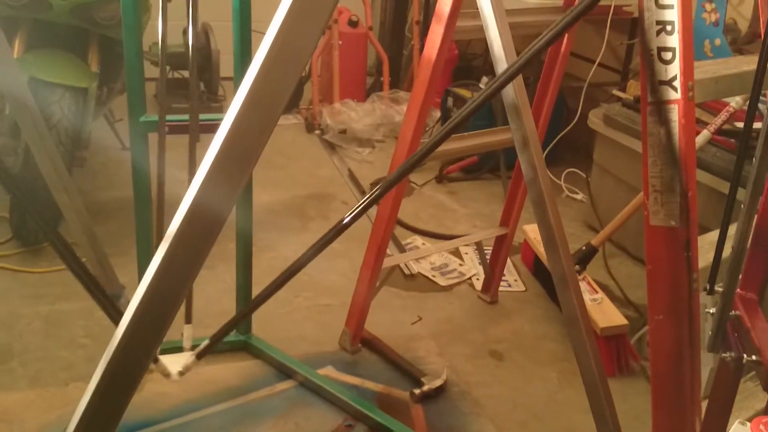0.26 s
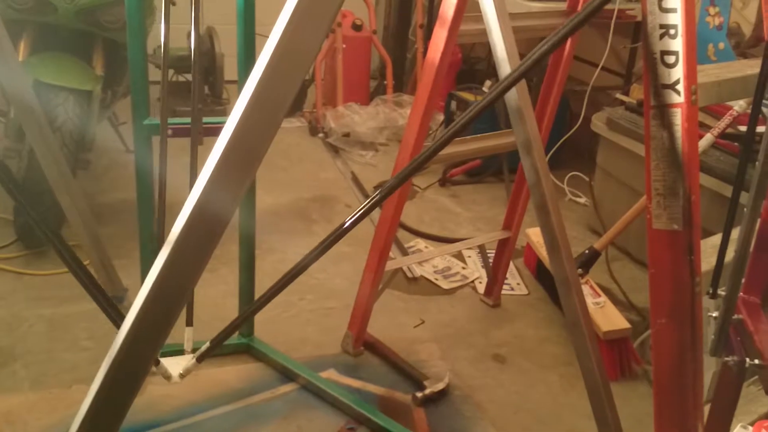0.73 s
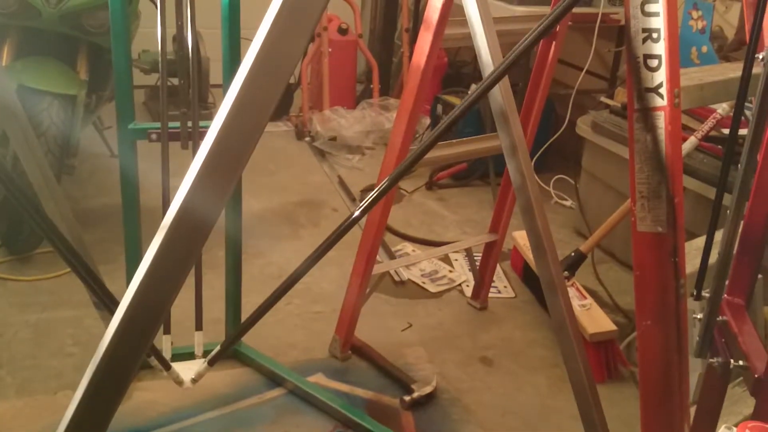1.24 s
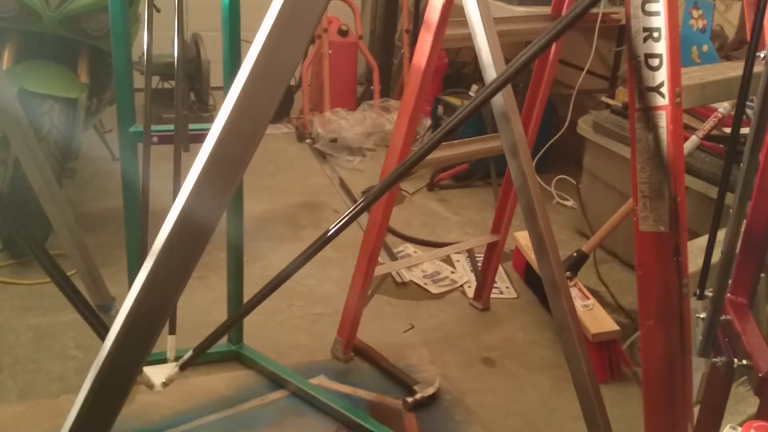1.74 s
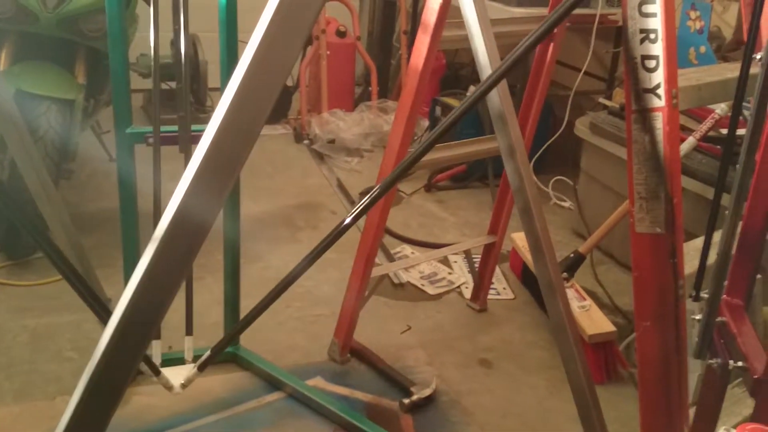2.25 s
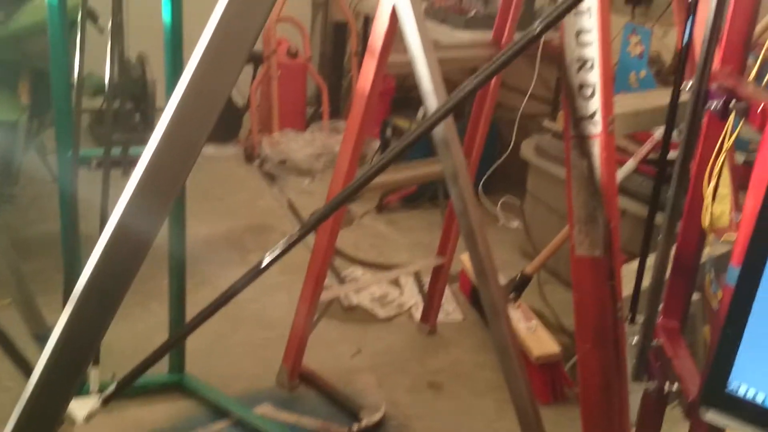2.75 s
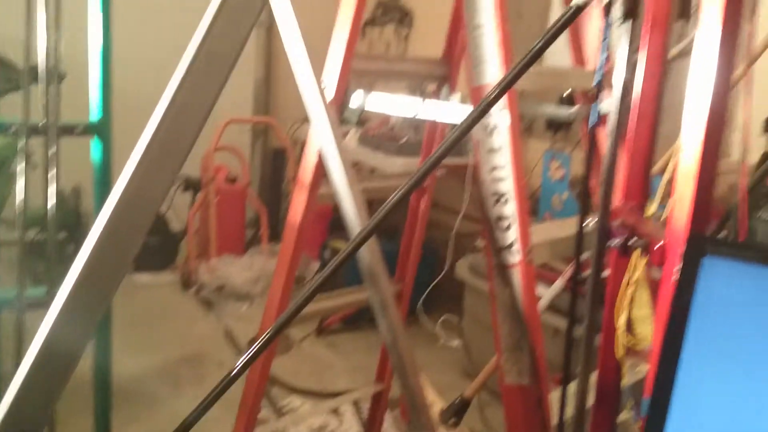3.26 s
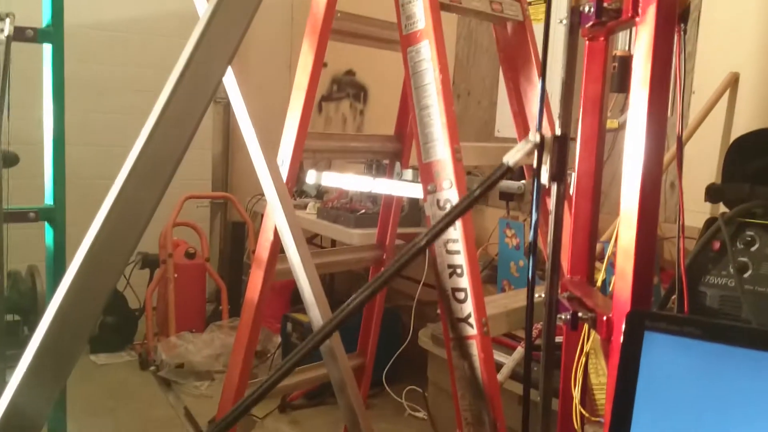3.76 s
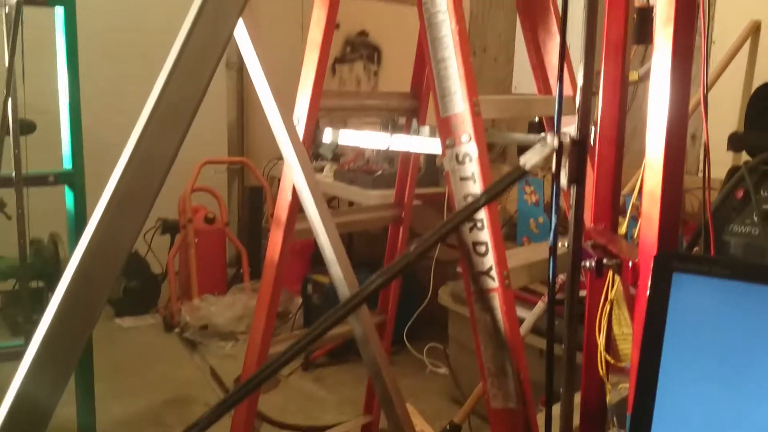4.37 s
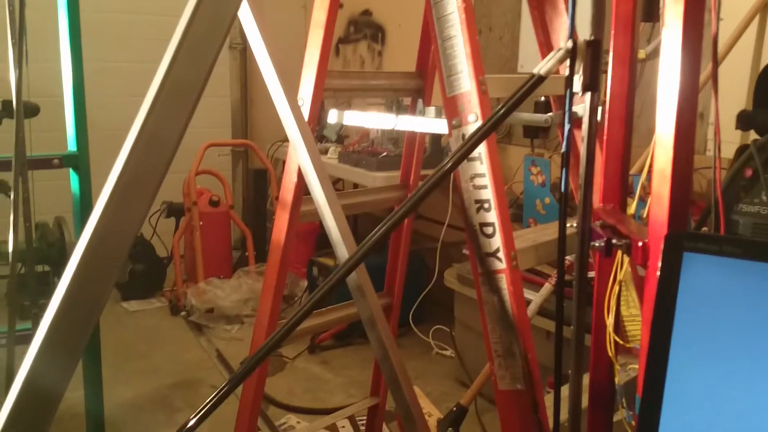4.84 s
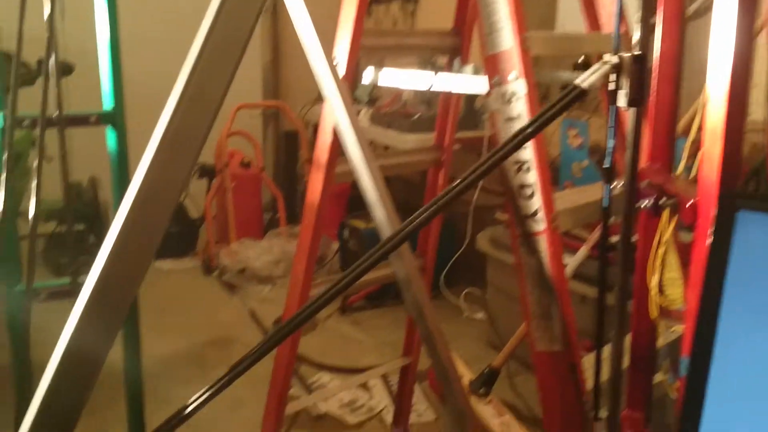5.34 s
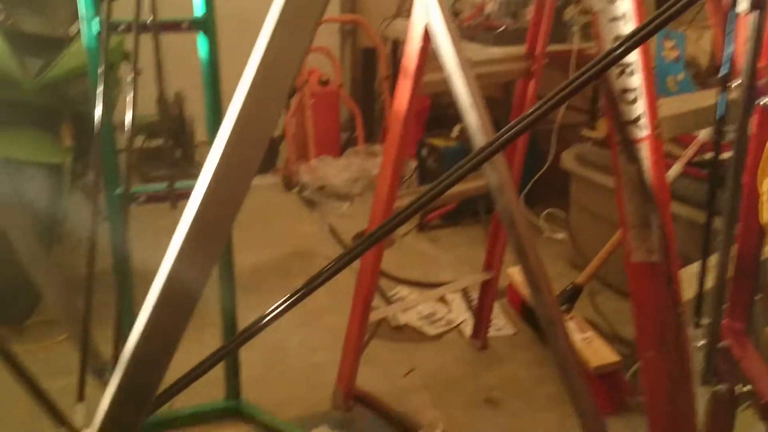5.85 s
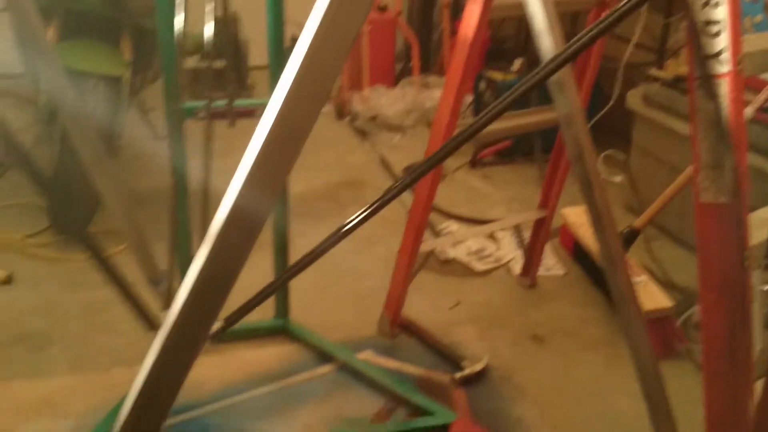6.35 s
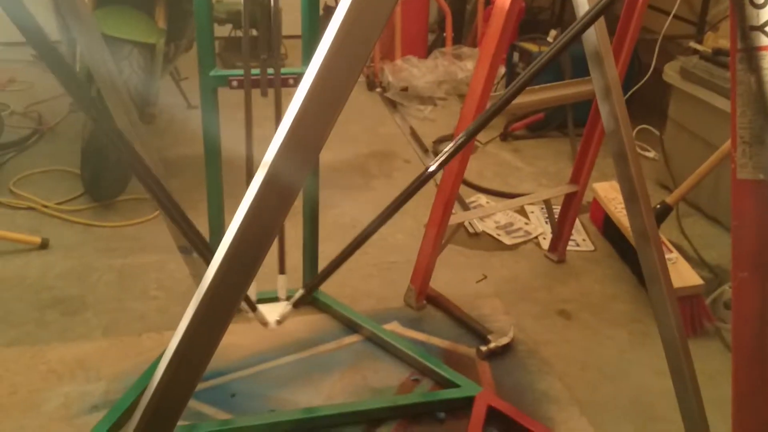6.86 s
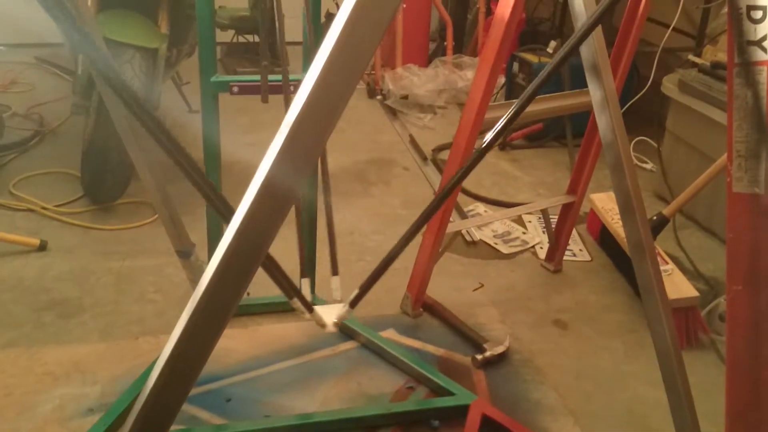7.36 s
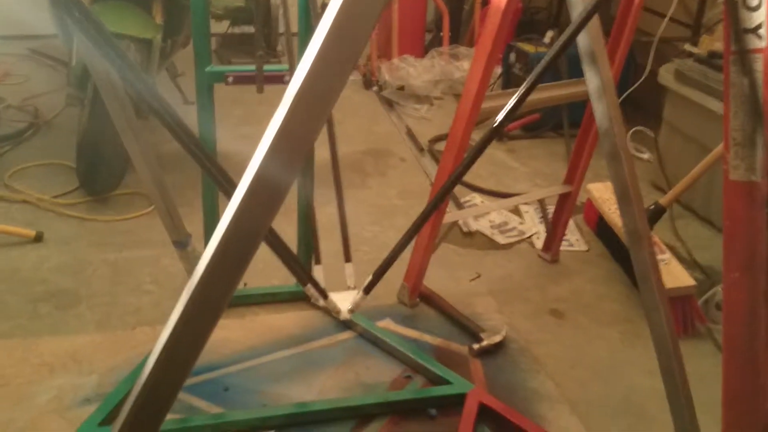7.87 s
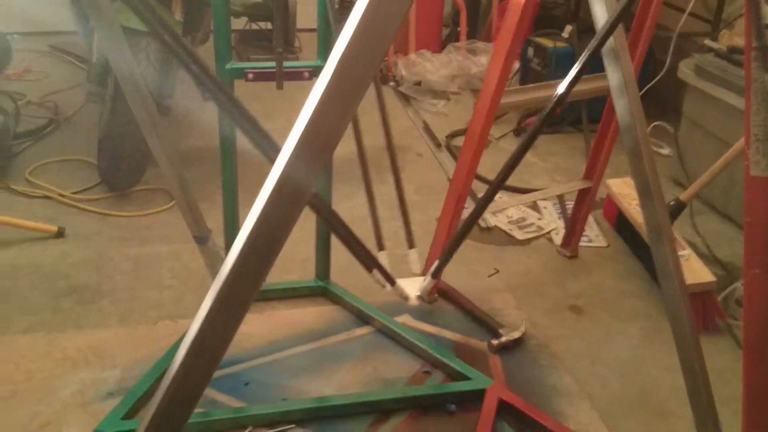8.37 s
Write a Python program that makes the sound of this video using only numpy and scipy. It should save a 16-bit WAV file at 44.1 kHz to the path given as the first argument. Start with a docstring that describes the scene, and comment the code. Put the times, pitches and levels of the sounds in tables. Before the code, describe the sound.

A large 3D printer's stepper motors whine in short runs, sweeping up and down in pitch over hissing carriages in a quiet garage.

```python
"""A large delta 3D printer makes short runs in a quiet garage, heard from a hand-held phone.
It opens at top speed: the steppers' tone beats with the controller's tick over hissing carriages.
The motors sweep down, then up and down in eight more quick runs, ringing the steel frame.
Sharp clicks fall in a pause near 6 s, and the longest, buzziest run follows.
Two short runs close the scene; between them, at 8.5 s, the hand gives the phone its hardest bump."""
import sys
import numpy as np
from scipy import signal
from scipy.fft import irfft, next_fast_len
from scipy.io import wavfile
from scipy.ndimage import uniform_filter1d

SR = 44100
rng = np.random.default_rng(int(sys.argv[2]) if len(sys.argv) > 2 else 0)


def master(y):
    """Save y as 16-bit WAV."""
    cut = np.clip(np.atleast_2d(y).T, -1, 1)
    pcm = np.round(cut * 32767)  # scale
    wavfile.write(sys.argv[1], SR, pcm.astype(np.int16))


N = 379701
T = np.arange(N) / SR
STEP_HZ, TICK_HZ = 1093.8, 2009.5  # step rate at top speed, controller's tick rate
SPEED_UP_HZ_PER_S, BRAKE_HZ_PER_S = 11500, 6300
TOP_HZ = 15800  # the phone's treble limit


def undb(db):
    """Decibels to gain."""
    return np.exp(np.asarray(db) * (np.log(10) / 20))


def unit(x):
    """Scale to an rms of 1."""
    return x / np.sqrt(np.mean(x ** 2))


def curves(table):
    """Automation curves, one for each column after the time."""
    times, *columns = np.transpose(table)
    return [np.interp(T, times, column) for column in columns]


def colour(points, hz):
    """Gain of an EQ curve at the given frequencies."""
    point_hz, db = np.transpose(points)
    return undb(np.interp(np.log(hz + 1), np.log(point_hz), db))


def walk(rate_hz):
    """A smooth random drift with a spread near 1."""
    knots = rng.standard_normal(int(N / SR * rate_hz) + 3)
    return 1.15 * np.interp(T * rate_hz, np.arange(len(knots)), knots)


def fade(t, t60):
    """Exponential decay by 60 dB in t60 seconds."""
    return np.exp(-np.log(1000) * t / t60)


def slew(x, t60):
    """Follow a control with an exponential attack and release."""
    pole = fade(1 / SR, t60)
    return signal.lfilter([1 - pole], [1, -pole], x, zi=[pole * x[0]])[0]


def cue_envelope(cues, t60):
    """An envelope that glides to each cue's level and releases after it."""
    return slew(sum(undb(db) * ((T >= start) & (T < end)) for start, end, db in cues), t60)


def bandpass(x, edges_hz, order=2):
    """Keep the band between two edges."""
    return signal.sosfilt(signal.butter(order, edges_hz, "band", fs=SR, output="sos"), x)


def ring(x, response):
    """Pass a sound through a stereo impulse response."""
    return signal.fftconvolve(np.atleast_2d(np.float32(x)), np.float32(response), axes=1)[:, :N]


def noise(points, alike_hz, ripple_db=0, ripple_hz=70):
    """Coloured stereo noise, narrower below alike_hz; ripple adds many faint resonances."""
    size = next_fast_len(N, True)
    hz = np.arange(size // 2 + 1) * SR / size
    mid, side = rng.standard_normal((2, 2 * len(hz))).view(complex) * colour(points, hz)
    knots = rng.standard_normal(1000)
    ripple = undb(ripple_db * np.interp(hz / ripple_hz, np.arange(len(knots)), knots))
    alike = .65 / (1 + (hz / alike_hz) ** 2)
    mid, side = ripple * mid * np.sqrt(1 + alike), ripple * side * np.sqrt(1 - alike)
    return unit(irfft(np.array([mid + side, mid - side], np.complex64), size)[:, :N])


# EQ of the background bed: (frequency [Hz], relative level [dB])
AIR_EQ = [(20, -29), (65, -2.5), (100, -9), (150, -9), (300, -10), (550, -8.5), (950, -5), (1500, -10.5),
          (3000, -12), (5500, -14.5), (8000, -19.5), (12500, -15), (15300, -15)]
def room_tone(level_db=-62.5):
    """A steady bed of still garage air and microphone hiss."""
    return undb(level_db) * noise(AIR_EQ, alike_hz=240)


def garage_reverb(x, t60=0.29, attack_s=0.0066):
    """The garage's short diffuse tail, different on each side."""
    tail = rng.standard_normal((2, SR)) * fade(T[:SR], t60) * np.minimum(T[:SR] / attack_s, 1)
    return ring(x, tail / np.sqrt(np.sum(tail ** 2) / 2))


def knocks(hits, attack_s, thud):
    """Noise bursts die away in one broad resonance; thud adds a blunt swing at the start."""
    out, t = np.zeros((2, N + SR)), T[:SR // 5]
    for time, db, hz, t60, width in hits:
        strike = rng.standard_normal((2, len(t))) * fade(t, t60) * (1 - np.exp(-t / attack_s))
        mid, side = unit(bandpass(strike, [hz / (1 + width), min(hz * (1 + width), SR * .45)]))
        swing = unit(np.sin(2 * np.pi * hz * t) * np.exp(-1.5 * hz * t))
        spread = min(.5 + hz / 3000, 1) * np.array([[1], [-1]])
        burst = mid - thud * swing + spread * side
        rms = np.sqrt(np.sum(burst ** 2) / 2 / (SR * t60 / 3))  # over the first third of the ring
        start = int(time * SR)
        out[:, start:start + len(t)] += undb(db) * burst / rms
    return out[:, :N]


# Handling thumps: (time [s], relative level [dB], centre [Hz], t60 [s], bandwidth [ratio])
HAND_BUMPS = [(.72, -49, 610, 0.024, 0.36), (2.858, -53, 70, 0.2, 0.54), (2.859, -50, 350, 0.13, 0.54),
              (2.995, -51.5, 450, 0.14, 0.49), (3.2, -56, 370.6, 0.11, .44), (3.245, -59, 494, 0.088, .44),
              (5.27, -63.5, 79.7, 0.15, 0.41), (6.44, -62, 89.4, 0.069, 0.48), (6.9, -60, 64, 0.13, 0.36),
              (7.82, -62.5, 73.6, 0.37, 0.38), (8.108, -50.5, 355, 0.042, .6),
              (8.503, -33, 335, 0.043, 0.38), (8.503, -36, 97.9, 0.1, 0.64), (8.522, -43, 405, 0.05, 0.13)]
def hand_bumps(trim_db=-6.5):
    """The hand knocks the phone's body: dull, dry and close."""
    return undb(trim_db) * knocks(HAND_BUMPS, attack_s=0.0031, thud=0.91)


# Sharp clicks: (time [s], relative level [dB], centre [Hz], t60 [s], bandwidth [ratio])
SHARP_CLICKS = [(1.442, -48.5, 6500, 0.039, 0.56), (1.447, -48.5, 1900, 0.045, 0.73),
                (5.985, -48, 3900, 0.015, 0.53), (5.987, -55, 1180, 0.052, 0.46),
                (5.998, -54, 4230, 0.017, .25), (6.05, -55, 3490, 0.017, .4),
                (7.844, -53, 4830, .025, 0.28), (7.845, -57, 9200, .015, .06),
                (7.937, -47, 4520, 0.016, 0.13), (8.503, -46, 1180, 0.011, .49)]
def sharp_clicks(trim_db=-3, reverb_db=-4):
    """Sharp clicks with a short garage tail; the last is the crack of the bump on the phone."""
    clicks = undb(trim_db) * knocks(SHARP_CLICKS, attack_s=0.000064, thud=0)
    return clicks + undb(reverb_db) * garage_reverb(clicks)


# Sizzle cues: (start [s], end [s], level [dB])
SIZZLE_CUES = [(1.08, 1.58, -64), (1.92, 2.1, -67), (2.32, 2.48, -67), (4.28, 4.42, -70),
               (4.92, 5.101, -71)]
def top_sizzle(low_hz=14200):
    """A thin hiss at the top of the treble, between some runs."""
    hiss = unit(bandpass(rng.standard_normal((2, N)), [low_hz, TOP_HZ], order=3))
    return cue_envelope(SIZZLE_CUES, t60=0.1) * hiss


def belt_rub(start_s=3.55, peak_s=3.75, end_s=4.4, peak_db=-61, hz=2143, half_width_hz=70):
    """A belt rubs its guide: one narrow squeak that swells and fades."""
    squeak = unit(bandpass(rng.standard_normal((2, N)), [hz - half_width_hz, hz + half_width_hz]))
    return undb(peak_db) * np.interp(T, [start_s, peak_s, end_s], [0, 1, 0]) * squeak


def morph(make, rate_hz):
    """Drift between two versions of a texture, as the moving carriages change its colour."""
    angle = np.pi / 2 * walk(rate_hz)
    return np.cos(angle) * make() + np.sin(angle) * make()


def step_rasp(eq, orders=14):
    """Uneven step timing adds a dense comb of treble lines."""
    hz = np.abs(np.arange(-orders, orders)[:, None] * STEP_HZ + np.arange(1, orders // 2) * TICK_HZ)
    hz = hz[(hz > 1500) & (hz < 11000)]
    phases = np.exp(2j * np.pi * rng.random((2, len(hz))))
    spectrum = np.zeros((2, SR + 1), complex)  # half-hertz bins make a 2 s loop
    spectrum[:, np.round(2 * hz).astype(int)] = colour(eq, hz) * phases
    return unit(irfft(spectrum))[:, np.arange(N) % (2 * SR)]


# EQ of the sliding carriages: (frequency [Hz], relative level [dB])
SLIDE_EQ = [(80, -28), (300, -11.5), (650, -11.5), (900, -4), (1100, -2), (1600, -6), (1980, 1), (2300, -5),
            (3000, 1), (3600, -3.5), (4100, 0.5), (5200, -1), (5480, 3.5), (5750, -2.5), (6150, -1.5),
            (6700, -10.5), (9200, -8), (12500, -13.5), (15300, -10.5)]
def carriage_hiss(rate, cruise, moving, rasp_db=-10, throb_depth=0.066, grain_db=1, split_hz=6700):
    """Belts and bearings hiss louder with speed, the top band less so; at top speed they throb."""
    speed = slew(rate / STEP_HZ, t60=0.33) ** 2
    sliding = np.maximum(slew(moving, t60=0.068), slew(moving, t60=0.65))  # fast in, slow out
    run_db = per_run("hiss")

    def fader(rest_db, creep_db, full_db):
        travel = sliding * undb(creep_db + speed * (full_db + run_db - creep_db))
        return np.hypot(undb(rest_db), travel)

    throb = 1 + throb_depth * cruise * np.sin(2 * np.pi * (2 * STEP_HZ - TICK_HZ) * T)
    hiss = morph(lambda: noise(SLIDE_EQ, alike_hz=340, ripple_db=3.5), rate_hz=2.5)
    hiss *= throb * undb(grain_db * walk(90))
    hiss += undb(rasp_db) * cruise * morph(lambda: step_rasp(SLIDE_EQ), rate_hz=3)
    low = signal.sosfiltfilt(signal.butter(4, split_hz, fs=SR, output="sos"), hiss)
    return fader(-71, -55, -50) * low + fader(-60, -53.5, -51) * (hiss - low)


def partial(hz, jitter, lag_rad, pan_db=0):
    """One steady tone with a wavering phase; the left side lags by lag_rad and is up by pan_db."""
    phase = np.float32(2 * np.pi * ((hz * T + rng.uniform()) % 1) + hz / TICK_HZ * jitter)
    half, left = np.float32(lag_rad / 2), np.float32(undb(pan_db))
    return np.array([left * np.sin(phase - half), np.sin(phase + half)]) / np.sqrt((1 + left ** 2) / 2)


def diffuse_partial(steps, ticks, jitter, lag_rad, sway, standing_hz=3800):
    """A mix tone of both rates; standing waves set its stereo phase, fully so above standing_hz."""
    hz = steps * STEP_HZ + ticks * TICK_HZ
    standing_rad = min(hz / standing_hz, 1) * (sway + rng.uniform(-np.pi, np.pi))
    return partial(hz, jitter, lag_rad + standing_rad)


# Buzz cues: (start [s], end [s], chord level [dB])
BUZZ_CUES = [(0.81, 0.957, -58.5), (3.03, 3.177, -58), (4.57, 4.879, -58), (6.245, 6.386, -53.5),
             (6.403, 6.664, -57), (6.67, 7.07, -64), (7.087, 7.298, -53), (7.31, 7.455, -62.5),
             (7.457, 7.558, -53.5), (8.227, 8.361, -59)]
# Voicing of the buzz: (step rate [multiple], tick rate [multiple])
BUZZ_CHORD = [(-3, 2), (5, -2), (-2, 2), (3, -1)]
# Balance of those partials: (relative level [dB])
BUZZ_MIX = [-15.5, -2, -5, -10]
def motor_buzz(jitter, lag_rad, grain_db=0.5):
    """The motor breaks into a grainy chord that comes and goes within the runs."""
    chord = sum(undb(db) * partial(steps * STEP_HZ + ticks * TICK_HZ, jitter, lag_rad)
                for (steps, ticks), db in zip(BUZZ_CHORD, BUZZ_MIX))
    return cue_envelope(BUZZ_CUES, t60=0.28) * chord * undb(grain_db * walk(70))


# Detuned twin that makes the tick tone pulse: (time [s], relative level [dB])
TICK_PULSE = [(3.4, -7), (3.6, -10), (4.2, -6), (4.5, -18), (5.6, -16), (6.3, -11), (7.6, -8), (8.1, -14)]
# Partials around the tick tone: (step rate [multiple], tick rate [multiple])
TICK_CHORD = [(-4, 3), (2, 0), (4, -1), (-1, 2), (0, 2), (4, 0), (6, -1)]
# Balance of those partials: (relative level [dB])
TICK_MIX = [-16, -18.5, -15, -14, -17, -17, -14.5]
def tick_tone(cruise, moving, jitter, sway, bearing, idle_db=-69, beat_hz=10.3, delay_s=0.048):
    """The controller's tick holds one pitch; it swells at top speed and stays faint in the sweeps."""
    step_lag, tick_lag, _, _, pan_db = bearing
    swell = slew(cruise * undb(per_run("tick")) + (1 - cruise) * moving * undb(idle_db), t60=0.44)
    tick = partial(TICK_HZ, jitter, tick_lag, pan_db)
    twin = undb(curves(TICK_PULSE)[0]) * partial(TICK_HZ - beat_hz, jitter, 0)
    late_swell = np.interp(T - delay_s, T, swell) * undb(2.3 * walk(35))
    chord = sum(undb(db) * diffuse_partial(steps, ticks, jitter, step_lag, sway)
                for (steps, ticks), db in zip(TICK_CHORD, TICK_MIX))
    shrill_gain = undb(-9 + 3 * walk(11))
    shrill = shrill_gain * partial(5 * STEP_HZ - TICK_HZ, jitter, step_lag - 2.2, pan_db=-4)
    return late_swell * (tick + twin) + swell * (chord + shrill)


def step_tone(cruise, jitter, sway, bearing, beat_hz=13, twin_db=-20, waver_db=3, release_t60=0.62):
    """At top speed the steps sing with overtones and mix tones; a faint twin makes them throb."""
    step_lag, _, third_lag, fifth_lag, _ = bearing
    step = partial(STEP_HZ, jitter, step_lag, per_run("pan"))
    twin = undb(twin_db) * partial(STEP_HZ - beat_hz, jitter, 0)
    third = partial(3 * STEP_HZ, jitter, third_lag)
    fifth = partial(5 * STEP_HZ, jitter, fifth_lag)
    shimmer = sum(diffuse_partial(steps, ticks, jitter, step_lag, sway) * undb(db + 2 * walk(9))
                  for steps, ticks, db in [(2, 1, -5), (6, -1, -7)])
    tones = undb(per_run("step") + walk(12)) * (step + twin)
    tones += undb(per_run("difference")) * partial(TICK_HZ - STEP_HZ, jitter, 0, pan_db=-6)
    tones += undb(per_run("third") + waver_db * walk(40)) * third
    tones += undb(per_run("fifth") + waver_db * walk(40)) * (fifth + shimmer)
    return np.maximum(cruise, slew(cruise, release_t60)) * tones


# Stereo image as the phone turns; lags are the left side's: (time [s], step lag [rad], tick lag [rad],
# third harmonic lag [rad], fifth harmonic lag [rad], tick left minus right [dB])
STEREO_IMAGE = [(.8, 0.39, 1.6, -2, -2, 4), (2.6, .1, 2.4, -2.5, -1.7, 11), (3.1, 2.9, 2.3, -2, -1.5, 3),
                (3.8, 2.46, 0.34, -4, -2.5, 7), (4.7, 1.85, 1.27, -1, -7, 5),
                (5.3, 1.65, 1.7, -1.4, -3.5, 12), (6.3, 1.28, 3, -2, -3, -8), (8.1, 0.21, 2.6, 4, -8.5, 3)]
def motor_whine(cruise, moving, jitter_rad=0.24, sway_rad=0.85):
    """Steps fall on controller ticks, so both rates sound along with their sums and differences."""
    bearing = curves(STEREO_IMAGE)
    jitter, sway = jitter_rad * walk(30), sway_rad * walk(2.27)
    steps = step_tone(cruise, jitter, sway, bearing)
    ticks = tick_tone(cruise, moving, jitter, sway, bearing)
    buzz = motor_buzz(jitter, lag_rad=bearing[0] / 2)
    return np.sqrt(2) * (steps + ticks + buzz)


# Slaps off floor and walls: (left delay [s], right delay [s], relative level [dB])
SLAPS = [(.0152, .0154, -2.5), (0.0382, .0382, -3)]
def reflections(x, scatter_db=-0.5, scatter_t60=0.58, predelay_s=0.006, reverb_db=-7):
    """Floor and walls echo a sound, nearby surfaces scatter it and the garage adds its tail."""
    t = T[:SR // 2]
    slaps = sum(undb(db) * np.array([np.interp(T - delay, T, x) for delay in delays])
                for *delays, db in SLAPS)
    scatter = rng.standard_normal((2, len(t))) * fade(t, scatter_t60) * (t > predelay_s)
    scattered = ring(x, scatter / np.sqrt(np.sum(scatter ** 2) / 2))
    return slaps + undb(scatter_db) * scattered + undb(reverb_db) * garage_reverb(x)


# Modes of the steel frame: (frequency [Hz], relative level [dB], t60 [s])
FRAME_MODES = [(193.4, -15, 0.26), (304, -9.5, 0.4), (320, -2, 0.13), (385, -13.5, 0.21), (598, -13, 0.48),
               (621, -12.5, 0.77), (686, -7, 0.83), (675, -12.5, 0.97), (845, 1.5, 0.44), (865, 3, 1),
               (927, 7, 0.55), (974, 1, 0.93), (1070, -17, 0.41)]
def frame_ring(drive, spread_s=0.00065, attack_s=0.02):
    """Each mode of the frame blooms and rings on as a sweep passes through it."""
    t = T[:SR // 2]
    lags = spread_s * rng.uniform(-0.42, 0.6, (len(FRAME_MODES), 2, 1))
    modes = sum(undb(db) * fade(t, t60) * np.sin(2 * np.pi * hz * (t - lag))
                for (hz, db, t60), lag in zip(FRAME_MODES, lags))
    return ring(drive, modes * np.minimum(t / attack_s, 1) * 2 * np.sqrt(BRAKE_HZ_PER_S) / SR)


# How strongly a motor radiates on its mount: (frequency [Hz], gain [dB])
MOUNT_EQ = [(400, -42), (680, -20.5), (820, -16), (878, -9.5), (905, 1.5), (945, 2.5), (1020, -5.5),
            (1094, -0.5), (1135, -7), (1300, -10)]
def motor_sweeps(rate, push, trim_db=-45.5, frame_db=-12, growl_rad=0.35, growl_db=2):
    """The step tone and its differences with the tick chirp through the mount and shake the frame."""
    cycles = np.cumsum(rate) / SR
    phase = 2 * np.pi * cycles + growl_rad * walk(250)  # the rotor hunts as its speed changes
    drive = push * np.sin(phase)
    third = undb(-23) * colour(MOUNT_EQ, 3 * rate) * push * np.sin(3 * phase)
    chirp = colour(MOUNT_EQ, rate) * drive + third
    for order, db in [(1, -16), (2, -17)]:
        difference = push * rate / STEP_HZ * np.sin(2 * np.pi * TICK_HZ * T - order * phase)
        chirp += undb(db) * colour(MOUNT_EQ, np.abs(TICK_HZ - order * rate)) * difference
    chirp *= undb(growl_db * walk(180))
    # two more motors have less far to go and turn more slowly
    slow_motors = undb(-3) * push * sum(np.sin(2 * np.pi * ratio * cycles) for ratio in (.64, .3))
    frame = undb(frame_db) * frame_ring(drive + slow_motors)
    return undb(trim_db) * (chirp + frame + reflections(chirp))


# Stretches in which some carriage is moving: (start [s], end [s])
TRAVEL_CUES = [(-.3, 1.12), (1.54, 5.55), (6.11, 7.66), (8.0, 8.9)]
# Cue sheet of the runs with their faders: (top speed reached [s], braking starts [s], sweep [dB],
# hiss [dB], step tone [dB], step left minus right [dB], difference tone [dB], tick tone [dB],
# third harmonic [dB], fifth harmonic [dB])
RUN_CUES = [(-.3, 0.506, 2.5, -2, -47.5, -2.5, -67, -62.5, -62, -56.5),
            (.735, 0.996, 1.5, -1, -53.5, -5, -61.5, -54.5, -63.5, -57.5),
            (1.638, 1.851, 1.5, -1, -50.5, 2, -64.5, -62, -60, -57.5),
            (2.118, 2.272, 2, -1.5, -54.5, -2, -67, -65, -63, -60),
            (2.511, 2.711, 1.5, -1.5, -51.5, 5.5, -69, -62, -64, -59.5),
            (2.954, 3.197, 2, -1.5, -51.5, -2.5, -65, -53, -60.5, -63.5),
            (3.441, 4.215, 1, -1, -50.5, 0, -66.5, -61.5, -67, -60.5),
            (4.456, 4.858, 0.5, -0.5, -51.5, 0, -61.5, -51.5, -64, -71),
            (5.125, 5.446, 0.5, -1, -51, 5, -70, -56.5, -59, -60),
            (6.204, 7.539, 0, 0.67, -54.5, -5.5, -59.5, -53, -89, -65.5),
            (8.095, 8.325, 1.5, -0.5, -55.5, -12, -65, -52, -66, -64.5),
            (8.585, 8.9, 1.5, 0.5, -48.5, 3, -50, -64, -76, -68)]
def motion(rise_db=0.5, fall_db=-1.64, crossfade_s=0.024):
    """Each run ramps up, holds and brakes: step rate, sweep strength, top-speed gate, travel gate."""
    rate, push, cruise = np.zeros((3, N))
    for start, stop, db, *_ in RUN_CUES:
        below_top_hz = np.maximum(SPEED_UP_HZ_PER_S * (start - T), BRAKE_HZ_PER_S * (T - stop))
        hz = np.clip(STEP_HZ - below_top_hz, 0, STEP_HZ)
        strength = undb(db + np.where(T < (start + stop) / 2, rise_db, fall_db))
        push = np.where(hz > rate, strength, push)  # where ramps overlap, the faster one leads
        rate = np.maximum(rate, hz)
        cruise += (T >= start) & (T <= stop)
    cruise = uniform_filter1d(cruise, int(crossfade_s * SR))
    push *= (1 - cruise) * np.minimum(rate / 200, 1)  # sweeps fade at top speed and near rest
    moving = sum(1. * ((T >= start) & (T <= stop)) for start, stop in TRAVEL_CUES)
    return rate, push, cruise, moving


def per_run(fader):
    """One fader of the cue sheet in dB, steady within each run and gliding between runs."""
    column = 3 + ["hiss", "step", "pan", "difference", "tick", "third", "fifth"].index(fader)
    return curves([(time, run[column]) for run in RUN_CUES for time in run[:2]])[0]


def scene():
    """The printer up front, over small knocks and room tone."""
    rate, push, cruise, moving = motion()
    background = sharp_clicks() + hand_bumps() + room_tone()
    motors = motor_sweeps(rate, push) + motor_whine(cruise, moving)
    return background + motors + carriage_hiss(rate, cruise, moving) + belt_rub() + top_sizzle()


def record(dry, balance_db=-1, low_cut_hz=43):
    """The phone leans slightly to the right and cuts the deep bass and the top."""
    sides = undb(np.array([[balance_db], [-balance_db]]) / 2)
    thin = signal.sosfilt(signal.butter(2, low_cut_hz, "high", fs=SR, output="sos"), dry * sides)
    return signal.sosfilt(signal.ellip(10, .2, 70, TOP_HZ, fs=SR, output="sos"), thin)


dry = scene()
out = record(dry)
master(out)
```